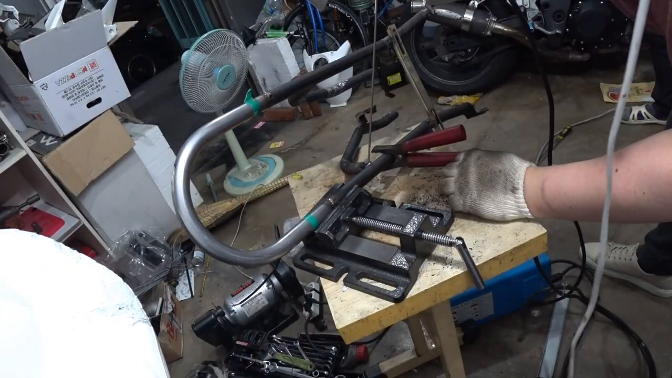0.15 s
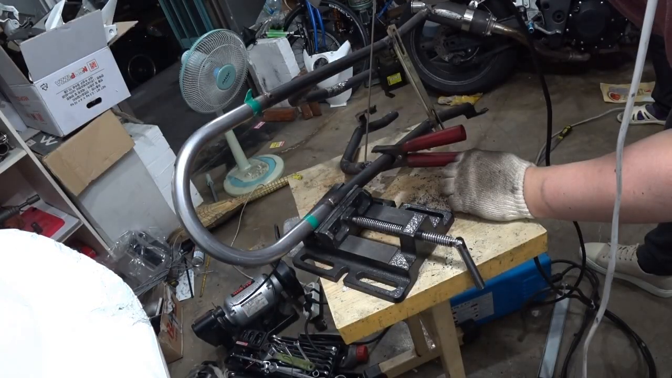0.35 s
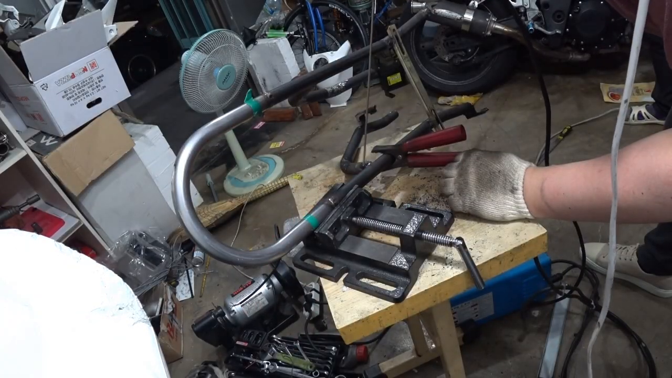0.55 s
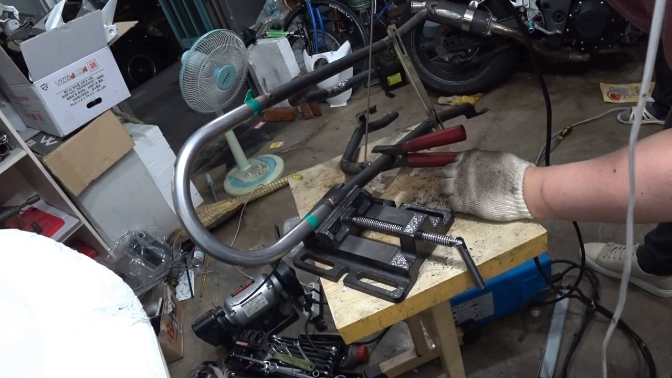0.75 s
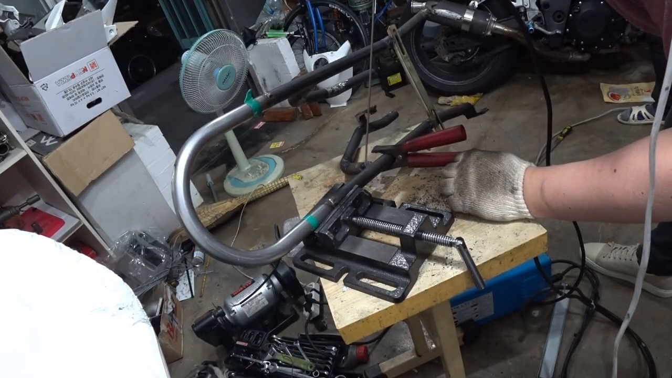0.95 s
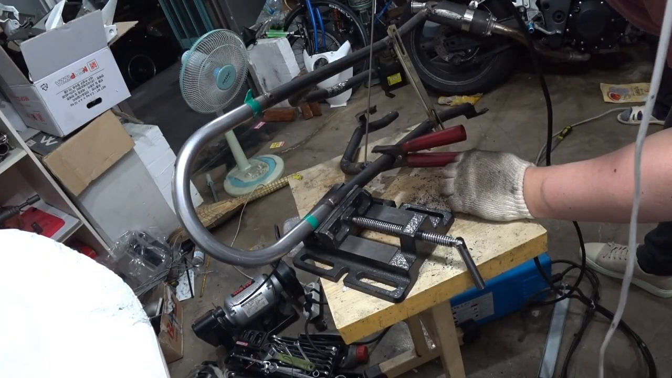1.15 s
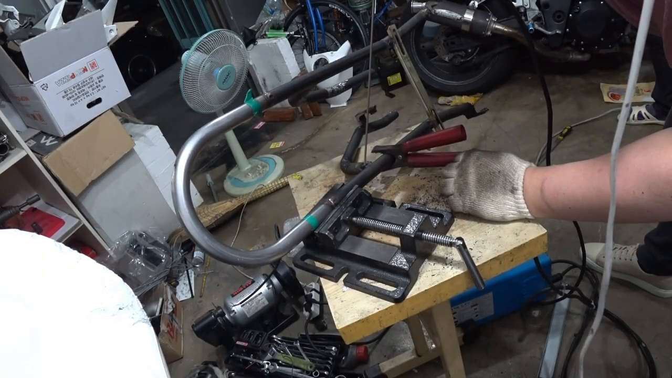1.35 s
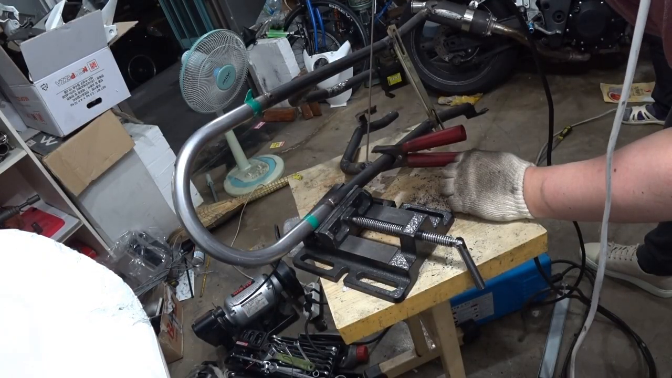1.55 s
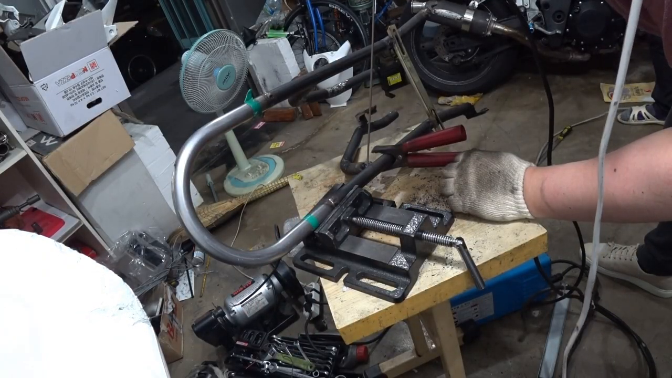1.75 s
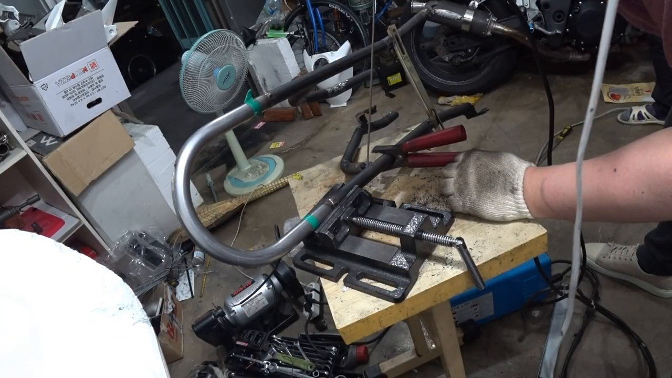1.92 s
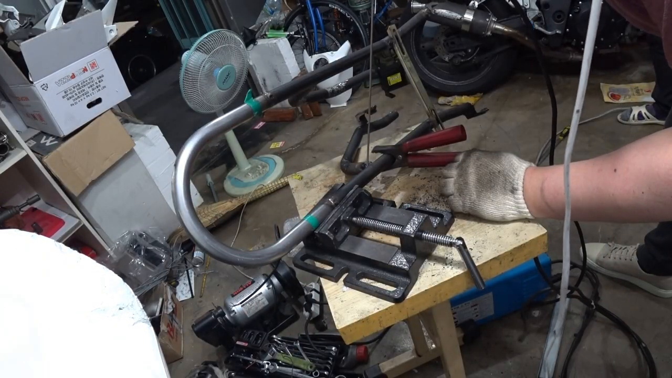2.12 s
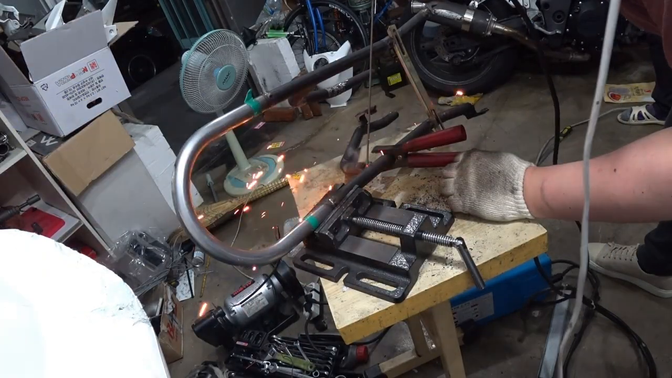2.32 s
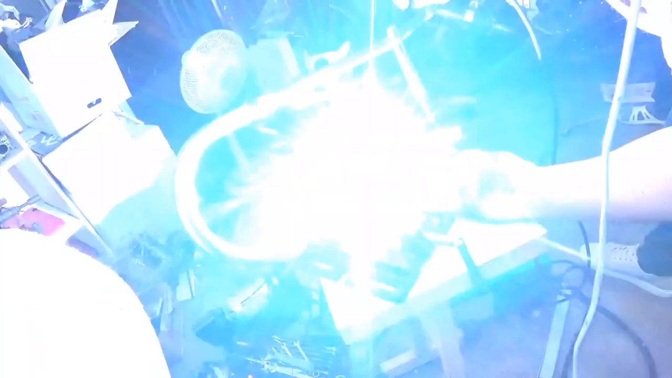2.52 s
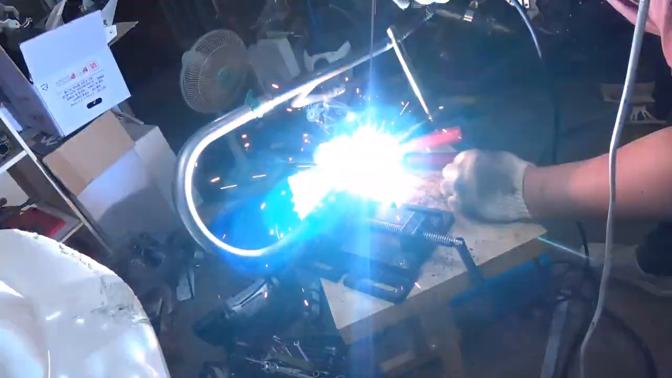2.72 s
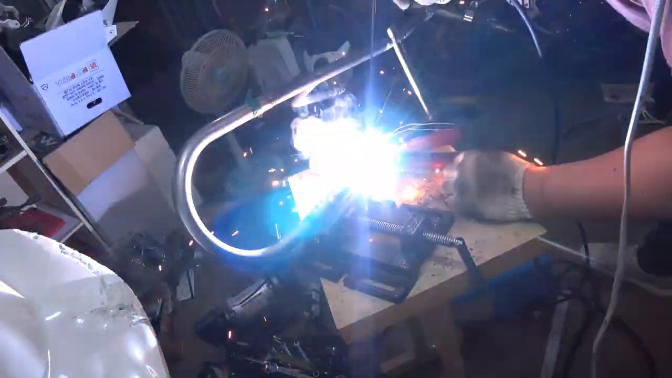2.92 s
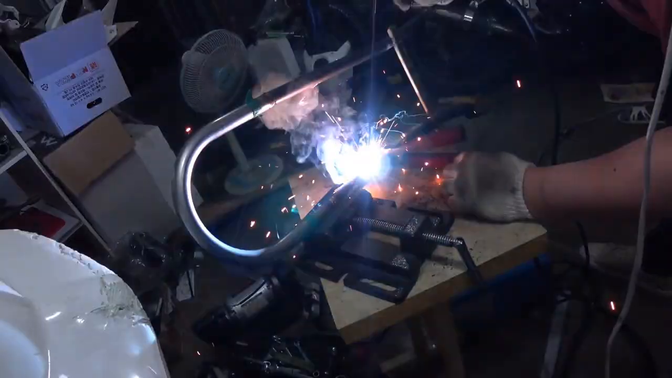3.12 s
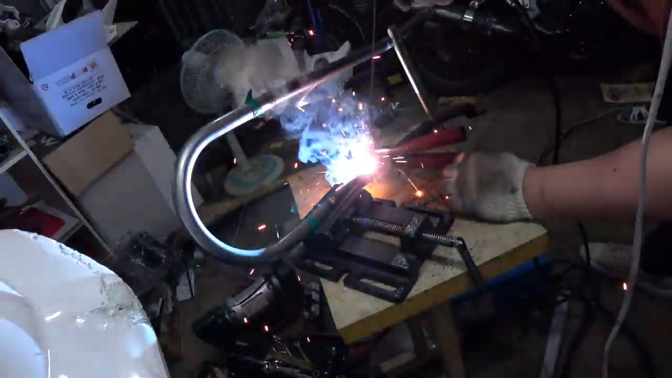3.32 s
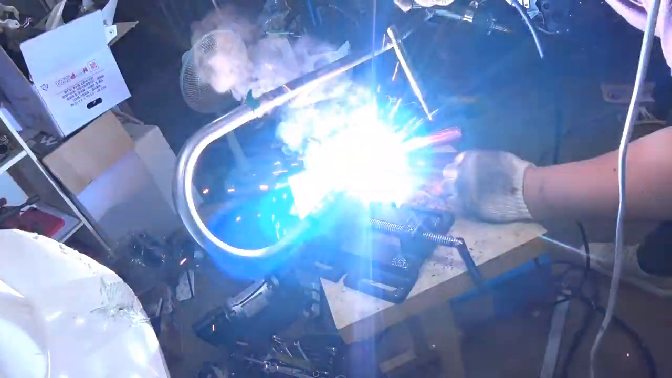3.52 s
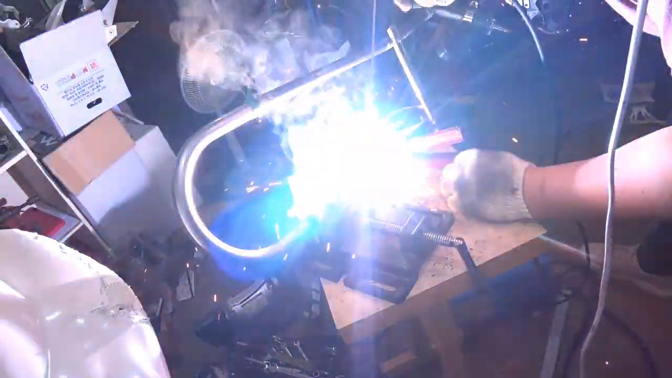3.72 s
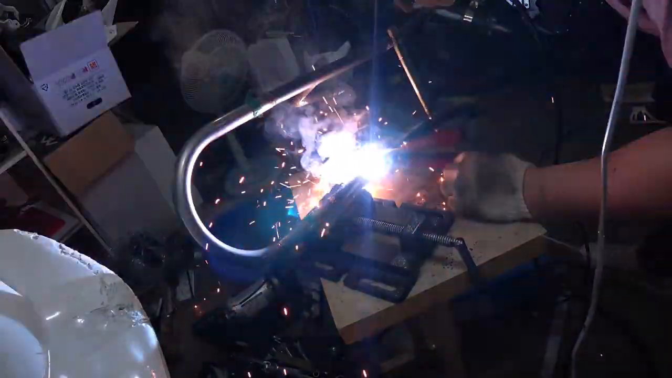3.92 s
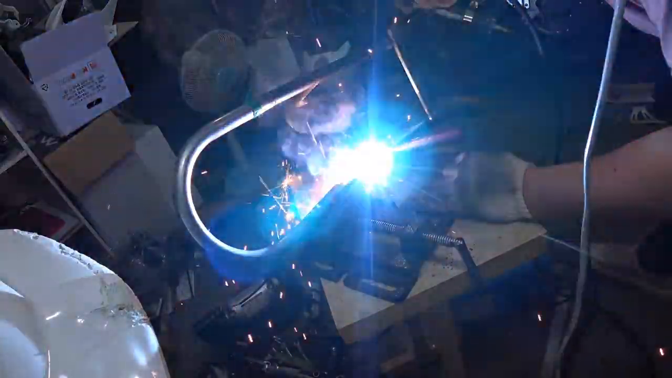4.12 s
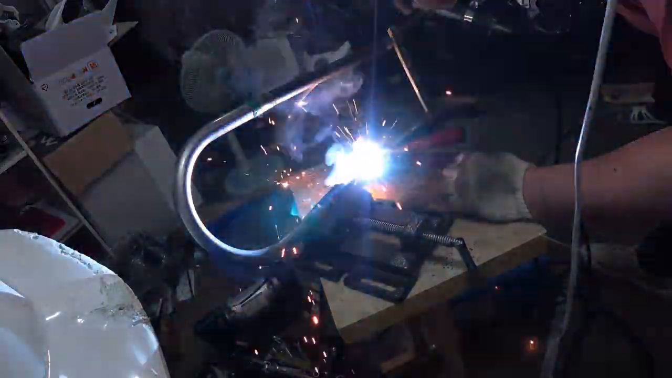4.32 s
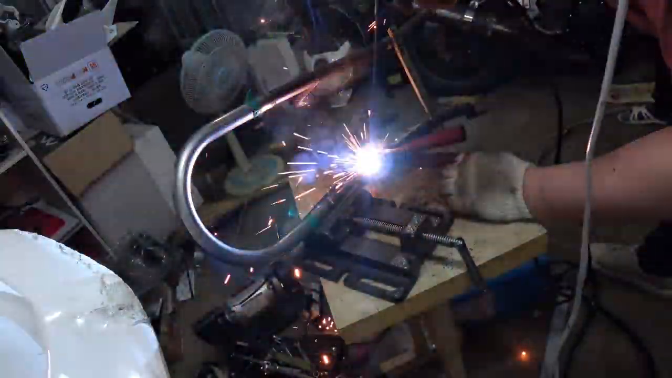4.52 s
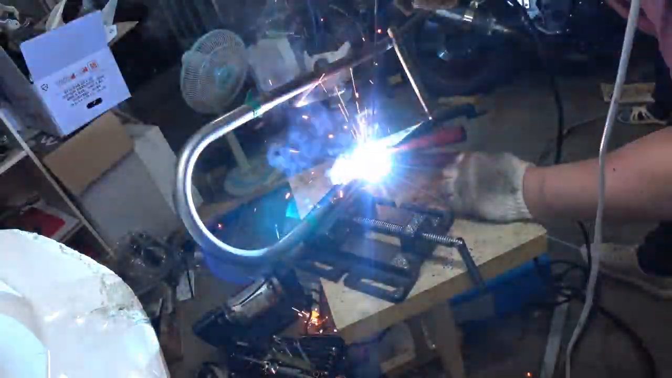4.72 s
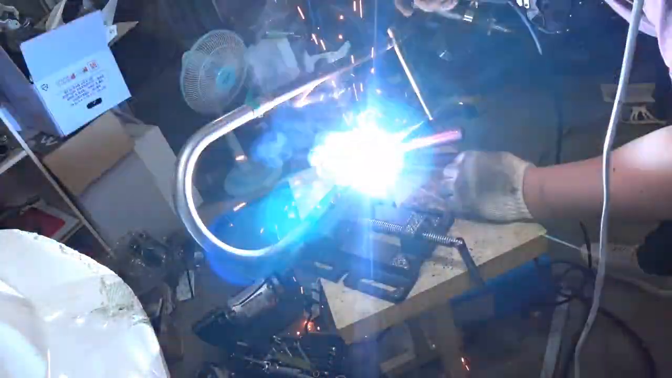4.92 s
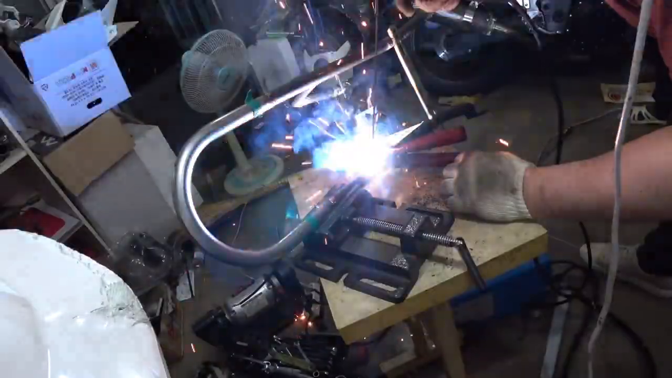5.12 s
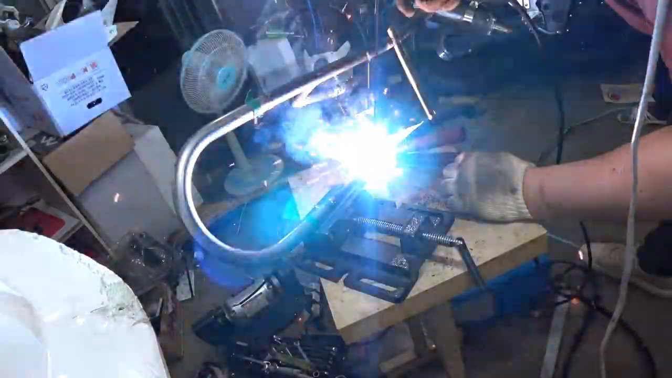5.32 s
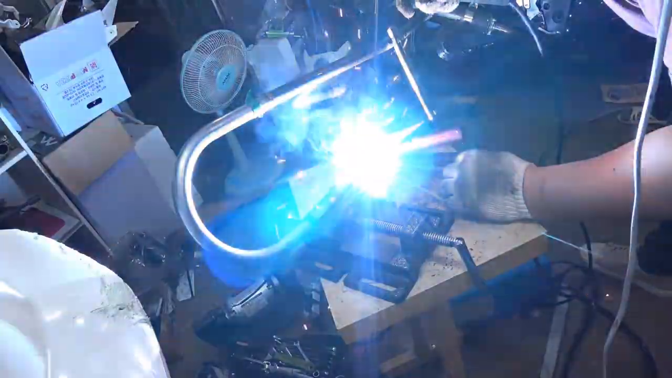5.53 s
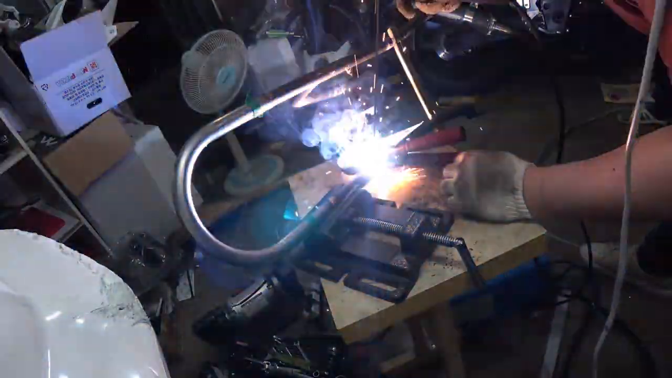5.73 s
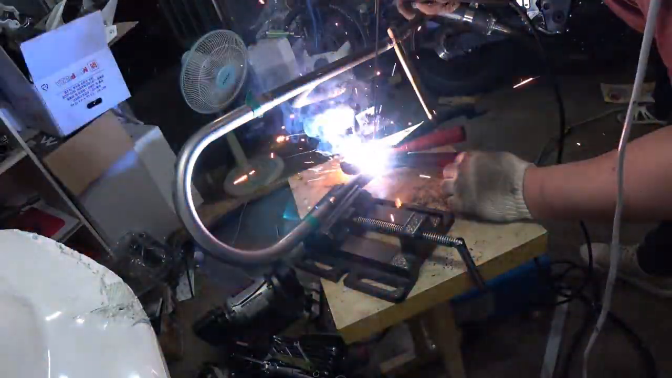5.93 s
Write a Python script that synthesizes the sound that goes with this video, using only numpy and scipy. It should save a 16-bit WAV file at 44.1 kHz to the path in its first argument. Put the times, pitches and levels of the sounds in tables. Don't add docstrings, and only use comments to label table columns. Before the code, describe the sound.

For the first two seconds there is low fan air with a faint wavering tone, broken by one hard snap, a few scratchy scrapes and a tap with a tiny metallic ring. Then a short burst of sparks, a pause, and a loud welding arc to the end, crackling unevenly with bright pops, duller spits, buzzing chatter and hissing roar. Close microphone, small cluttered hard room.

```python
import sys
import numpy as np
from scipy import signal
from scipy.io import wavfile
from scipy.ndimage import uniform_filter1d

SR = 44100
rng = np.random.default_rng(int(sys.argv[2]) if len(sys.argv) > 2 else 0)


def rack_gain(trim_db):
    fader = np.asarray(trim_db, float)
    return 10 ** (fader / 20)


def generate_wav(sig):
    pcm = np.round(np.clip(np.atleast_2d(sig).T, -1, 1) * 32767).astype(np.int16)
    wavfile.write(sys.argv[1], SR, pcm)


N = 267246


def evened(x):
    return x / np.sqrt(np.mean(x ** 2) + 1e-20)


def read(points, hz):
    f, value = np.transpose(points)
    return np.interp(np.log(hz + 1), np.log(f + 1), value)


def bumps(peaks, hz):
    return sum(db / (1 + (2 * (hz - f) / width) ** 2) for f, width, db in peaks)


def causal(gain_db):
    log = np.log(rack_gain(np.maximum(gain_db, -90)))
    full = np.concatenate([log, log[-2:0:-1]])
    phase = -signal.hilbert(full).imag
    return np.fft.ifft(np.exp(full + 1j * phase)).real[:1024]


def wander(count, seconds):
    width = int(seconds * SR)
    drift = uniform_filter1d(uniform_filter1d(rng.standard_normal(count), width), width)
    return np.clip(evened(drift), -3, 2)


def add(mix, sound):
    mix[:len(sound)] += sound[:len(mix)]


# (time [s], level [dB], decay [s], dull minus bright [dB])
SCRAPES = [
    (0.818, -27, 0.0057, -3),
    (1.1363, -26.5, 0.014, 1.5),
    (1.2785, -21, 0.009, 1.5),
    (1.758, -21, 0.017, 5),
    (2.1415, -33, .01, -1),
]
# (start [s], end [s], first rate [1/s], last rate [1/s], level [dB],
# dull minus bright [dB])
CHATTER = [
    (4.4545, 4.491, 520, 900, -3.5, 2),
    (4.443, 4.454, 500, 600, -11, -5),
]
# (frequency [Hz], density [dB per Hz])
SPARK = [(300, -53), (1000, -13.5), (2400, -10.5), (3100, -6.5), (5000, -0.5), (7500, 1), (10000, 5),
         (14000, 0), (16500, -1)]
# (frequency [Hz], density [dB per Hz])
ROAR = [(150, -29), (300, -10.5), (600, -2), (1000, -1), (1600, -6), (2500, -7.5), (4000, -8), (8000, -55)]


def sparks():
    dull, bright = np.zeros((2, 2, N))
    bursts = drops()
    for s, db, tilt_db in bursts:
        burst(dull, bright, s, db + 1, tilt_db, seconds=.0009, fizz=.21)
    for s, db, seconds, tilt_db in SCRAPES:
        burst(dull, bright, s, db, tilt_db, seconds, fizz=.8)
    for start, end, first, last, db, tilt_db in CHATTER:
        t = np.arange(start, end, 1 / SR)
        turns = np.cumsum(np.interp(t, (start, end), (first, last))) / SR
        for s in t[1:][np.diff(turns // 1) > 0]:
            late, louder = rng.uniform(-1.2, 1, size=2)
            burst(dull, bright, s + .0003 * late, db + 1.6 * louder, tilt_db, seconds=.0004, fizz=.08)

    high, low, roar = arc_curves()
    flurry = rack_gain(3.4 * wander(N, 0.0023)) * shorted(bursts, seconds=0.012, depth_db=7.0)
    spark_db = 4.0 * np.minimum(rng.exponential(1, (2, N)), 3.0)
    sparks_per_s = 1500
    sizes = .45 + rack_gain(spark_db) * (rng.random((2, N)) < sparks_per_s / SR)
    one, two = rng.standard_normal((2, N)) * sizes
    dull += rack_gain(-3.5) * low * evened(flurry * (one + 0.42 * two))
    bright += rack_gain(-1.0) * high * evened(flurry * (two + 0.24 * one))

    split_hz = 6540
    hz = np.fft.rfftfreq(4096, 1 / SR)
    cross = (hz / split_hz) ** 8 + 1e-9
    out = np.zeros((2, N))
    for x, c in ((dull, cross), (bright, 1 / cross)):
        h = causal(read(SPARK, hz) - 10 * np.log10(1 + c))
        out += signal.oaconvolve(x, h[None] / np.linalg.norm(h))[:, :N]

    gusts = rack_gain(2.4 * wander(N, 0.024)) * rng.standard_normal(N)
    gas = evened(signal.oaconvolve(gusts, causal(read(ROAR, hz))))
    return out + rack_gain(-1.5) * roar * gas[:N]


# (time [s], energy [dB], dull minus bright [dB])
STRIKES = [
    (.4987, -1.5, -3),
    (1.7877, -7, -5),
    (2.2006, -5, -9),
    (2.2231, -5, -18),
    (2.2685, 1, -5),
    (2.3226, -1, -7),
    (2.4996, 5, 1),
    (2.5085, 0, -6),
]
# (time [s], energy [dB])
POPS = [(2.6724, 0), (2.7333, 1), (2.7407, 2), (2.8267, 1), (2.9342, 0), (2.9936, 2), (3.4686, 0),
        (3.513, 0), (3.5976, 3), (3.6163, 1), (3.8071, 1), (3.8829, 0), (3.9232, 0), (4.049, 0),
        (4.2866, 1), (4.4128, 1), (4.5642, 1), (4.5856, 0), (4.6226, 2), (4.7468, 1), (4.9238, 2),
        (5.0105, 2), (5.2764, 1), (5.2881, 2), (5.3052, 0), (5.3292, 0), (5.3552, 1), (5.4182, 2),
        (5.4851, 0), (5.9228, 1)]
# (time [s], energy [dB])
SPITS = [(2.6072, -1), (2.6392, -3), (2.6917, -1), (2.7701, -2), (2.8285, -5), (3.045, -3), (3.0888, -3),
         (3.1165, -1), (3.5289, -3), (3.5375, -1), (3.6342, -1), (3.6716, -2), (3.6953, -2), (3.7845, -2),
         (3.9807, -2), (4.08, -2), (4.157, -4), (5.0126, -1), (5.0137, -2), (5.0515, 0), (5.5049, -2),
         (5.6488, -3), (5.7673, -2), (5.8514, -2)]
# (first drop [s], last drop [s], period [s], energy [dB])
DRIPS = [(2.8578, 2.91, .0255, -3), (3.1375, 3.26, .0385, -2.5), (3.2837, 3.44, .0374, -1.5),
         (3.9522, 4.02, .062, -2), (4.1642, 4.38, .0422, -2), (4.6418, 4.9, .0345, -2.5),
         (5.0902, 5.25, .039, -3.5), (5.3944, 5.54, .0475, -2), (5.5955, 5.8, .0555, -2.5),
         (5.9513, 6.02, .0215, -2)]
# (middle [s], length [s], level [dB])
LULLS = [
    (2.907, .025, -9),
    (4.635, .025, -9),
    (5.037, 0.027, -4.5),
    (5.725, 0.028, -2.5),
    (5.913, 0.051, -4.5),
]


def drops():
    pop_tilt_db, spit_tilt_db, drip_tilt_db = -9, 2, -10
    big = [(s, db, pop_tilt_db) for s, db in POPS] + [(s, db, spit_tilt_db) for s, db in SPITS]
    taken = np.array(big)[:, 0]
    jitter_s = .002
    for first, last, period, db in DRIPS:
        times = np.arange(first, last, period)
        for s, (late, louder) in zip(times, rng.standard_normal((len(times), 2))):
            if abs(taken - s).min() > period / 3:
                big.append((s + jitter_s * late * (s > first), db + louder, drip_tilt_db))

    necks = [(s - rng.uniform(.0015, .006), db - 4.5, tilt_db)
             for s, db, tilt_db in big if rng.random() < .5 and tilt_db < 0]

    spatter_per_s, from_s = 17, 2.57
    stray = rng.uniform(from_s, N / SR, int(spatter_per_s * (N / SR - from_s)))
    stray = [s for s in stray if all(abs(s - mid) > length for mid, length, _ in LULLS)]
    spatter = [(s, -5.5 + 1.1 * rng.uniform(-1.7, 2), pop_tilt_db) for s in stray]

    rows = np.array(big + necks + spatter)
    tilt_spread_db = 4
    rows[:, 2] += tilt_spread_db * rng.uniform(-1.16, 1, len(rows))
    return list(STRIKES) + [tuple(row) for row in rows]


def burst(dull, bright, s, db, tilt_db, seconds, fizz):
    t = np.arange(2000) / SR
    attack_s = 0.00014
    shape = fizz * rng.choice([-1., 1.], 2000) * np.exp(-t / seconds) * np.minimum(t / attack_s, 1)
    shape[0] = -1
    both = rack_gain(db) * np.array([shape / np.linalg.norm(shape), t == 0]).T
    bright_share = 1 / (1 + rack_gain(2 * tilt_db))
    at = round(s * SR)
    add(dull.T[at:], np.sqrt(1 - bright_share) * both)
    add(bright.T[at:], np.sqrt(bright_share) * both)


# (time [s], sizzle [dB], dull minus bright [dB], gas roar re sizzle [dB])
FLASH = [
    (2.2, -27, -7, -26),
    (2.22, -29.5, -1, -14),
    (2.25, -26, -0.5, -13),
    (2.29, -30, 0.5, -29),
]
# (time [s], sizzle [dB], dull minus bright [dB], gas roar re sizzle [dB])
ARC = [(2.5, -24, -4, -22), (2.58, -35.5, 7, -3.5), (2.76, -29, 0.5, -8.5), (2.96, -26, -1.5, -15),
       (3.159, -30, -1.5, -13.5), (3.259, -34, 0.5, -11), (3.38, -29, -5.5, -8.5),
       (3.52, -28.5, -0.5, -16.5), (3.86, -26.5, 0.5, -9.5), (3.98, -28.5, -3, -19.5),
       (4.16, -26.5, -1, -12), (4.4, -28.5, -3.5, -12.5), (4.66, -31, -2.5, -11), (5.1, -31.5, 1, -8),
       (5.28, -27, -5, -14), (5.54, -26.5, 2, -10), (5.7, -26.5, -5, -10), (6.06, -27.5, -4, -9.5)]
# (middle [s], length [s], extra dull sizzle [dB], extra gas roar [dB])
DIPS = [(2.683, 0.15, 1.5, 0.5), (3.479, 0.14, 5.5, -5), (3.686, .12, 4.5, 3.5), (4.257, 0.054, -2, 1.5),
        (4.475, 0.068, 9, -1), (4.521, .07, 2.5, 8), (4.764, 0.066, -1, 5.5), (5.084, 0.12, -1.5, 6),
        (5.39, 0.12, 1.5, -3), (5.826, 0.17, 2.8, 1.5)]


def arc_curves():
    t, out = np.arange(N) / SR, np.zeros((3, N))
    for rows in (FLASH, ARC):
        s, bright, dull, roar = np.transpose(rows)
        on = (t >= s[0]) & (t <= s[-1])
        curves_db = [np.interp(t, s, v) for v in (bright, bright + dull, bright + roar)]
        out += on * rack_gain(np.array(curves_db))
    for s, length, dull_db, roar_db in DIPS:
        out[1:] *= rack_gain(np.outer([dull_db, roar_db], np.exp(-(2 * (t - s) / length) ** 4)))
    for s, length, db in LULLS:
        out *= rack_gain(db * np.exp(-(2 * (t - s) / length) ** 4))
    return uniform_filter1d(out, 60)


def shorted(bursts, seconds, depth_db):
    out = np.zeros(N)
    for s, db, _ in bursts:
        out[round((s - seconds) * SR):round(s * SR)] = -depth_db * (db >= -1)
    return rack_gain(uniform_filter1d(out, 90))


# (time [s], frequency [Hz], level [dB], t60 [s])
TUBE_TAPS = [
    (1.79, 2256, -40, .07),
    (1.788, 800, -44, .08),
]


def tube():
    out, t = np.zeros(N), np.arange(6000) / SR
    for s, hz, db, t60 in TUBE_TAPS:
        add(out[round(s * SR):], rack_gain(db - 60 * t / t60) * np.sin(2 * np.pi * hz * t))
    return out


# (time [s], level [dB])
THUMPS = [(2.219, -65), (2.499, -49), (2.679, -62), (2.828, -54), (2.999, -64), (3.599, -59), (3.819, -61),
          (3.879, -64), (4.419, -65), (4.479, -69), (4.599, -64), (5.919, -60), (3.28, -65), (4.079, -71),
          (5.179, -72), (5.39, -71)]


def thumps():
    out, t = np.zeros(N), np.arange(1300) / SR
    peak_s = .0008
    for s, db in THUMPS:
        add(out[round(s * SR):], rack_gain(db + 8) * (t / peak_s) * np.exp(1 - t / peak_s))
    return out


# (frequency [Hz], width [Hz], gain at seam start [dB], gain at seam end [dB])
NOOKS = [(3523, 500, 6.5, 6.5), (5210, 570, -5.5, 1), (5490, 140, 6, 0.5), (7110, 750, 8, 1.5),
         (8040, 480, 5, 3.5), (9020, 370, -6, -4), (9740, 1030, 7, 8), (11250, 500, -4, 4),
         (11600, 400, 7, 5), (12300, 370, 5, -10), (13200, 940, 8.5, 1.5), (13950, 600, -2, -3),
         (14840, 680, 4, 8)]
# (time [s], share done [0-1])
TRAVEL = [(2.2, .2), (2.6, 0.05), (3.9, 0.051), (4.4, 0.29), (4.9, 0.48), (5.2, 0.85), (6.06, 0.98)]


def nearby(x):
    hz = np.fft.rfftfreq(4096, 1 / SR)
    f, width, *ends = np.transpose(NOOKS)
    first, last = (signal.oaconvolve(x, causal(bumps(zip(f, width, db), hz)))[:N] for db in ends)
    done = np.clip(np.interp(np.arange(N) / SR, *np.transpose(TRAVEL)), 0, 1)
    return (1 - done) * first + done * last


# (frequency [Hz], t60 [s])
ROOM = [(500, 0.38), (2500, 0.35), (7000, 0.27), (16000, 0.19)]
# (frequency [Hz], side minus mid [dB])
ECHO_WIDE = [(500, -7), (2300, -1), (4400, -7), (9000, -6.5), (15000, -5)]


def room(x):
    taps = np.zeros((2, SR // 2))
    at = np.arange(60, SR // 2 - 8, 8) + rng.integers(0, 8, (2, (SR // 2 - 61) // 8))
    np.put_along_axis(taps, at, rng.choice([-1., 1.], at.shape), 1)
    hz, t, z = signal.stft(taps, SR, nperseg=128)
    z[1] *= rack_gain(read(ECHO_WIDE, hz))[:, None]
    decay = rack_gain(-60 * t / read(ROOM, hz)[:, None])
    mid, side = signal.istft(z * decay, SR, nperseg=128)[1]
    tail = np.array([mid + side, mid - side]) / np.linalg.norm(mid)
    return signal.fftconvolve(x[None], tail, axes=1)[:, :N]


# (frequency [Hz], density [dB per Hz])
FAN = [(18, -85), (30, -42), (221, -23), (245, -12), (280, -28), (311, -9.5), (449, -5), (554, -8.5),
       (866, -10.5), (1320, -15.5), (1810, -12.5), (2680, -19), (3670, -20.5), (12000, -37.5), (16000, -42)]
# (frequency [Hz], width [Hz], gain [dB])
FAN_BOX = [(325.5, 19, 5.5), (443, 24, 9.5), (493, 16, 9), (608, 19, 13.5), (820, 9.9, 10.5),
           (1125, 300, 6), (2060, 34, -0.5)]
# (frequency [Hz], side minus mid [dB])
WIDE = [(60, -14), (200, -18), (380, -19), (700, -12), (1290, -10), (2380, -7.5), (4400, -7.5), (8120, -8),
        (15000, -8)]
# (frequency [Hz], left phase lead [rad])
LEAD = [(150, 0.14), (600, 0.32), (2300, 0.56), (3500, 0.33), (4400, 0.01)]


def fan():
    frames, hz = N // 512 + 5, np.fft.rfftfreq(2048, 1 / SR)
    a, b, c, d, patches = rng.standard_normal((frames, 1025, 5)).T
    patches = evened(uniform_filter1d(uniform_filter1d(patches, 16, 0), 6, 1))
    mid = a + 1j * b
    side = rack_gain(read(WIDE, hz))[:, None] * (c + 1j * d)
    side = side + 1j * np.tan(read(LEAD, hz) / 2)[:, None] * mid
    tone_db = (read(FAN, hz) + bumps(FAN_BOX, hz))[:, None]
    z = np.array([mid + side, mid - side]) * rack_gain(tone_db + 1.1 * patches)
    air_db, blade_hz, blade_db = -44, 251.8, -62.5
    air = rack_gain(air_db) * evened(signal.istft(z, nperseg=2048, noverlap=1536)[1][:, :N])

    turns = np.cumsum(blade_hz * (1 + 0.0062 * wander(N, .15))) / SR
    blade = np.sin(2 * np.pi * turns) + 1.3 * np.sin(4 * np.pi * turns)
    return air + np.sqrt(2) * rack_gain(blade_db + 2.5 * wander(N, 0.1)) * blade


def scene():
    direct, spread = sparks() + tube()
    spread = 0.45 * spread + .48 * nearby(spread)
    return rack_gain(-2.0) * nearby(direct) + rack_gain(-4) * room(spread) + fan()


def overload(x):
    return signal.sosfilt(signal.butter(3, 85., "high", fs=SR, output="sos"), np.tanh(x))


# (mid level [dB], share [0-1])
KEPT = [(-38, .58), (-32, .26)]


def narrowed(x, chance_db=4.5, spared=.13, lead=564):
    mid, side = (x[0] + x[1]) / 2, np.pad((x[0] - x[1]) / 2, (lead, 0))
    z = signal.stft(side, nperseg=2048, noverlap=1024, window="cosine")[2]
    edges = np.r_[0:40:4, 40:96:8, 96:256:16, 256:768:32]
    widths = np.diff(np.r_[edges, len(z)])
    db = 10 * np.log10(np.add.reduceat(abs(z) ** 2, edges) / widths[:, None] + 1e-20)
    chance = chance_db * rng.standard_normal(db.shape)
    rank = (db + chance).argsort(axis=0).argsort(axis=0) / len(edges)

    level_db = 10 * np.log10(abs(uniform_filter1d(mid ** 2, size=2048)) + 1e-12)
    at = np.clip(np.arange(z.shape[1]) * 1024 - lead, 0, N - 1)
    share = np.interp(level_db[at], *np.transpose(KEPT))
    whole = (rng.random(len(share)) < spared) & (share < KEPT[0][1])
    keep = (rank >= 1 - share) | whole
    z = z * np.repeat(keep, widths, axis=0)
    side = signal.istft(z, nperseg=2048, noverlap=1024, window="cosine")[1][lead:lead + N]
    return np.array([mid + side, mid - side])


def band_limit(x):
    return signal.sosfilt(signal.butter(12, 16960, fs=SR, output="sos"), x)


def record(dry):
    edge_hz = 15750
    edge = signal.firwin(301, edge_hz, window=("kaiser", 6), fs=SR)[None]
    heard = overload(dry) + thumps()
    mix = narrowed(signal.oaconvolve(heard, edge, "same"))
    return band_limit(mix)


dry = scene()
out = record(dry)
generate_wav(out)
```